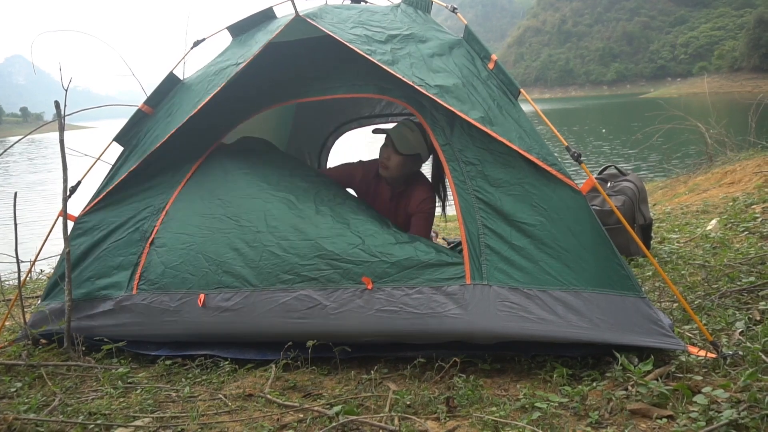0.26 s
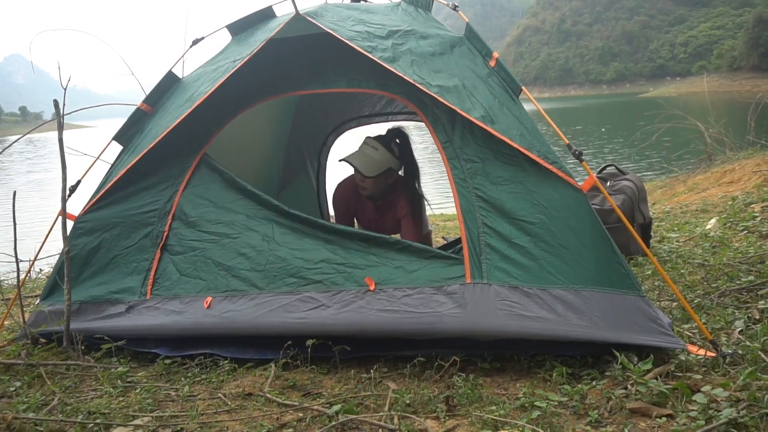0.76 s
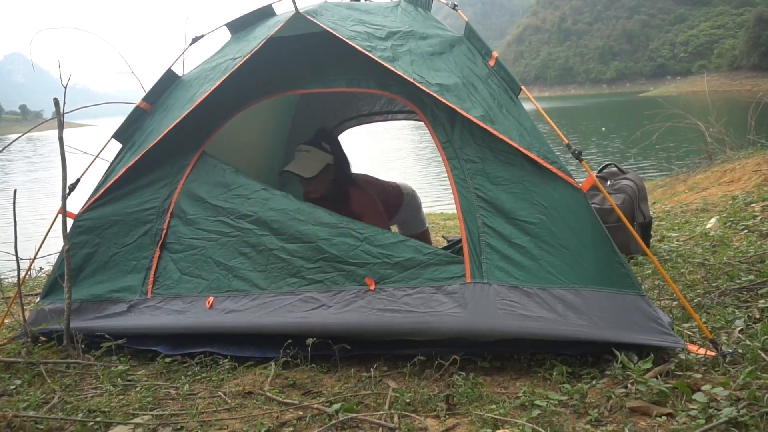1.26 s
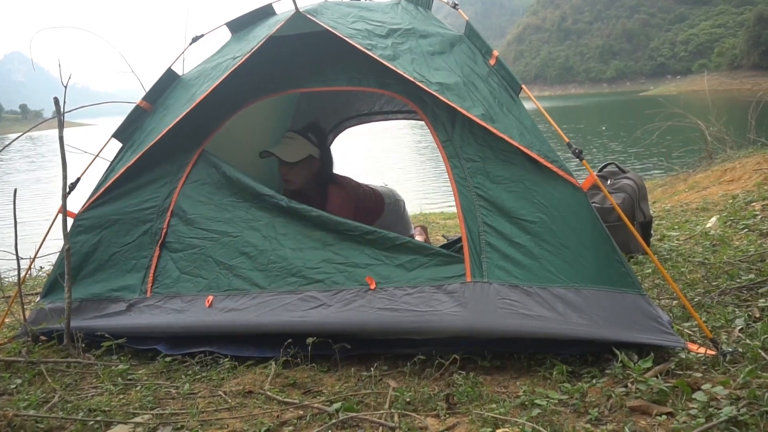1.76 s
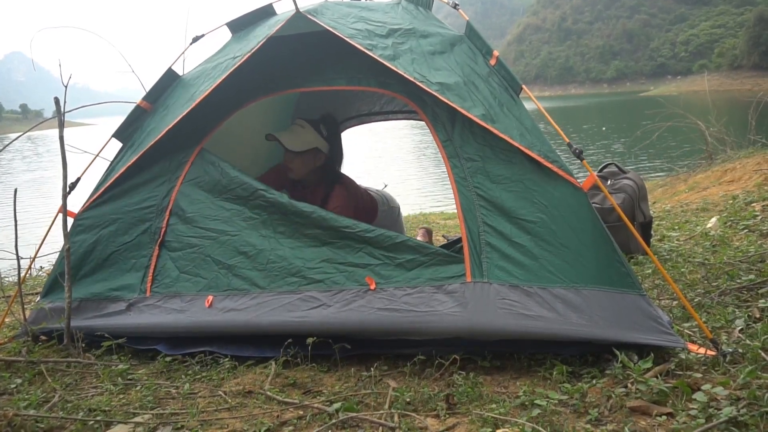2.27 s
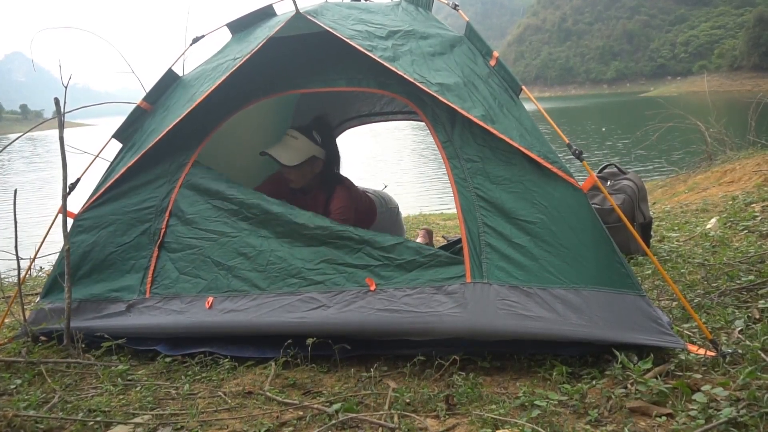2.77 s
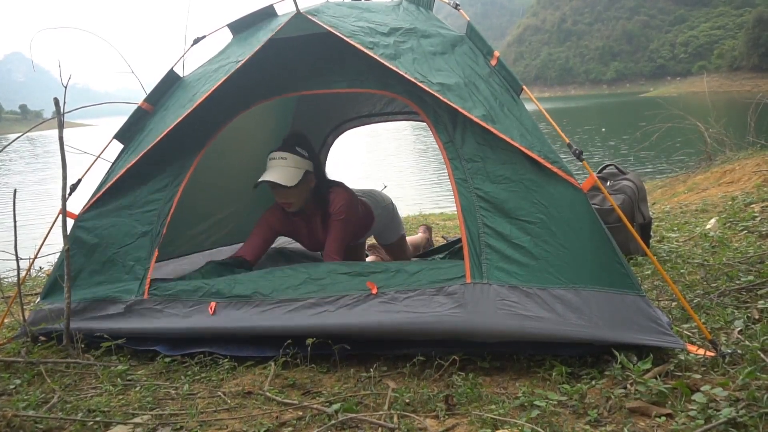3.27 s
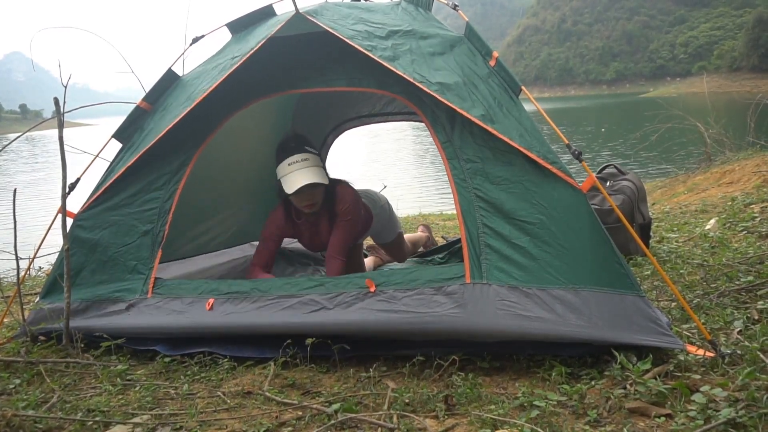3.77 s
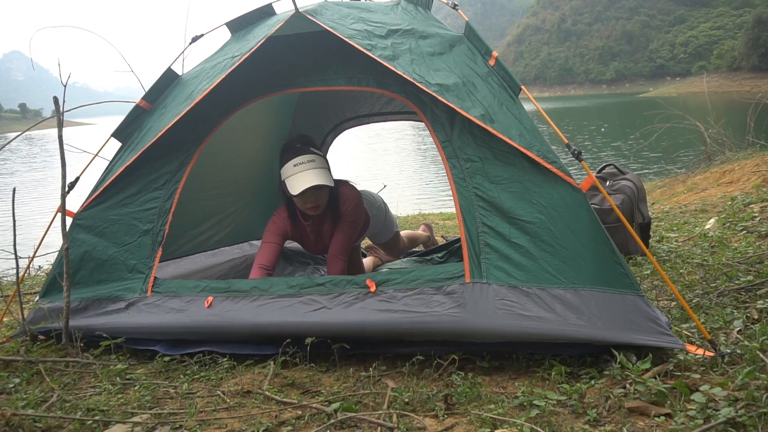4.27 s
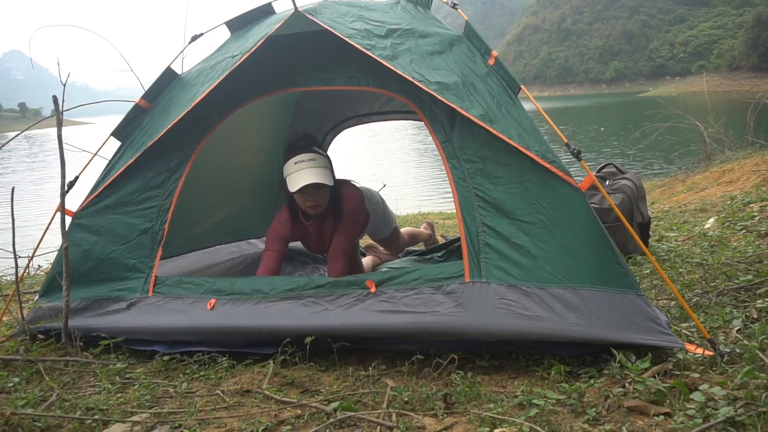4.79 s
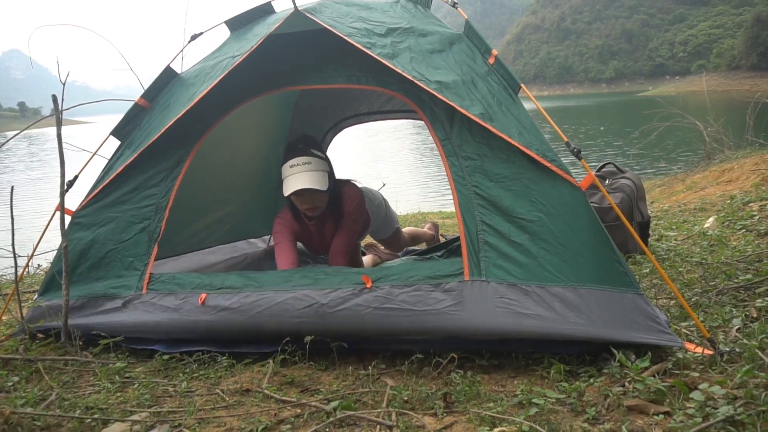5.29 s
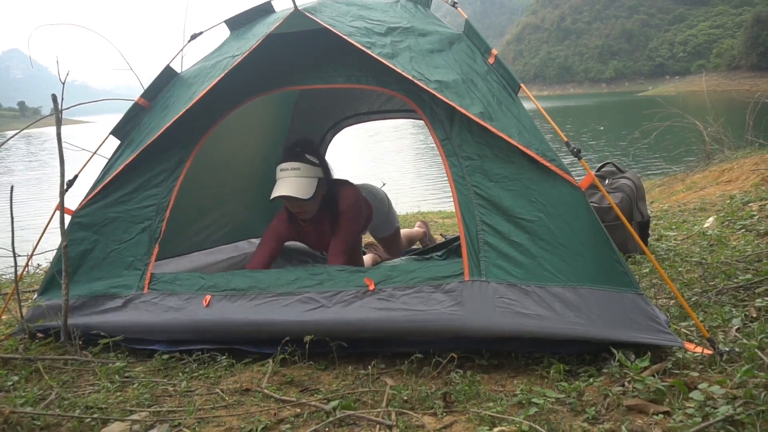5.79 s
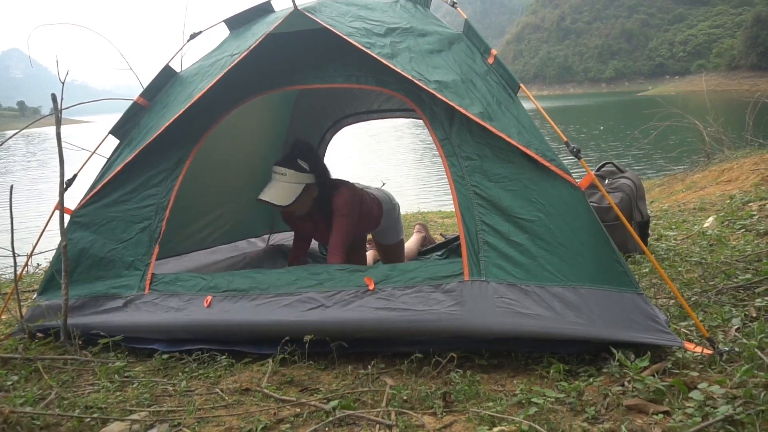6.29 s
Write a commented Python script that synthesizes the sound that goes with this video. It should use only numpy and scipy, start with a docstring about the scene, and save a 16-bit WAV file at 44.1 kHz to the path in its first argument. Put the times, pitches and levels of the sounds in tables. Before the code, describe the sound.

Two quick zipper pulls on a nylon tent door, close by, with swishing, snapping fabric and soft pats, faint birds and outdoor hush behind.

```python
"""A nylon tent door, close by, is unzipped in two quick pulls at a lakeside campsite: slider teeth jolt
the panel, whine in the tape and rasp, and the metal pull tab rings. Cloth strokes of shaped noise swish,
fold bursts snap, gliding tones squeak, and damped modes sound pats on the groundsheet and frame knocks.
Far off, bent whistles make small birds, narrow noise an insect, and steady noise a soft outdoor hush."""
import sys
import numpy as np
from scipy import signal
from scipy.fft import rfft, irfft, next_fast_len
from scipy.io import wavfile
from scipy.ndimage import uniform_filter1d

SR = 44100
rng = np.random.default_rng(int(sys.argv[2]) if len(sys.argv) > 2 else 0)


def waveform_to_disk(signal):
    """Save audio, clipped to [-1, 1], as 16-bit WAV at the path in sys.argv[1]."""
    frames = np.transpose(np.atleast_2d(signal))
    scaled = np.clip(frames, -1, 1) * 32767
    samples = np.round(scaled).astype(np.int16)
    wavfile.write(sys.argv[1], SR, samples)


N = 288590
T = np.arange(N) / SR
SIZE = next_fast_len(N + 512)
FREQS = np.maximum(np.arange(SIZE // 2 + 1) * SR / SIZE, 1)


def from_db(db):
    """Decibels to gain."""
    return 10 ** (np.asarray(db) / 20)


def rms_one(x):
    """Scale to rms 1."""
    return x / np.sqrt(np.mean(x ** 2) + 1e-20)


def at_hz(points, hz):
    """Read a table on a log-frequency axis."""
    points = np.array(points)
    return np.interp(np.log(hz), np.log(points[:, 0]), points[:, 1])


def colour(x, spectrum):
    """Give a steady sound a spectrum; rms 1."""
    shaped = rfft(x, SIZE) * from_db(at_hz(spectrum, FREQS))
    return rms_one(irfft(shaped, SIZE)[..., :N])


def band(x, low_hz, high_hz, order=2):
    """Butterworth band-pass."""
    edges = [low_hz, min(high_hz, .45 * SR)]
    sos = signal.butter(order, edges, "band", fs=SR, output="sos")
    return signal.sosfilt(sos, x + 1e-18)


def drift(rate):
    """Smooth random wander with spread 1; a higher rate wanders faster."""
    step = 20   # samples between drawn points
    r = np.exp(-2 * np.pi * step * rate / SR)
    noise = rng.standard_normal(N // step + 2002)
    slow = signal.lfilter([1], [1, -2 * r, r * r], noise)[2000:]   # skip the filter's start
    return np.interp(np.arange(N) / step, np.arange(len(slow)), rms_one(slow))


def resonance(x, hz, width_hz):
    """Two-pole resonance with gain 1 on top."""
    r = np.exp(-np.pi * width_hz / SR)
    zeros = np.array([1, 0, -1]) * (1 - r * r) / 2
    poles = [1, -2 * r * np.cos(2 * np.pi * hz / SR), r * r]
    return signal.lfilter(zeros, poles, x + 1e-18)


def grains(per_s, spread_db):
    """Two rows of tiny clicks at shared random moments, with uneven sizes; rms 1."""
    born = rng.random(N) < per_s / SR
    size = from_db(spread_db * np.minimum(rng.exponential(1, N), 4))
    return rms_one(born * size * rng.standard_normal((2, N)))


def patchy(x, depth_db, per_s):
    """Folds open and close, so narrow bands swell and fade each in their own time."""
    cells = signal.stft(x, SR, nperseg=512)[2]
    patches = uniform_filter1d(rng.standard_normal(cells.shape[1:]), size=4, axis=0)
    frames = max(2, int(SR / 256 / per_s))
    patches = uniform_filter1d(patches, size=frames, axis=1)
    changed = cells * from_db(depth_db * rms_one(patches))
    return rms_one(signal.istft(changed, SR, nperseg=512)[1][..., :N])


def turns(per_s, jitter, jitter_hz):
    """Running count of teeth passed at an unsteady speed."""
    return np.cumsum(per_s * (1 + jitter * drift(jitter_hz))) / SR


FADE_POWER = 1.09   # the fall steepens as the hand comes to rest


def swell(start_s, rise_s, fade_s, power):
    """A movement gathers speed, then dies away: 20 dB down after the fade time."""
    age = T - start_s
    rise = np.clip(age / rise_s, 0, 1) ** power
    return rise * from_db(-20 * np.clip((age - rise_s) / fade_s, 0, 10) ** FADE_POWER)


# how alike the close tent sounds on the left and right: f/Hz, likeness/0-1
TENT_LIKENESS = [(100, .997), (500, .98), (1400, .985), (2600, .82), (4500, .48), (9000, .45), (15000, .42)]


def stereo(pair, likeness=TENT_LIKENESS):
    """Two unrelated rows become left and right, whose likeness depends on frequency."""
    alike = np.clip(at_hz(likeness, FREQS), 0, 1)
    side = irfft(rfft(pair[1], SIZE) * np.sqrt((1 - alike) / (1 + alike)), SIZE)[:N]
    return pair[0] + side * [[1], [-1]]


FULL_SPEED = 1100   # teeth per s
PULL_ATTACK_S, PULL_RELEASE_S, SLACKEN_S = 0.0044, 0.05, 0.039
SPEED_LAW_DB = (3, 1.5, 4)   # panel, tape, rasp: dB gained per doubling of speed
SLACK_DB = (9.5, -3, -5)   # panel, tape, rasp: change once the flap hangs slack
# pulls on the slider: start t/s, length/s, time until the flap goes slack/s,
# then relative level/dB at full speed of door panel, tape, rasp
PULLS = [(-.006, 0.4485, 0.223, -41, -38, -39), (2.742, 0.44, 0.42, -44.5, -38, -46.5)]


def pull_gains(speed):
    """Gains of panel, tape and rasp: each grows with speed; a slack flap booms more and rasps less."""
    gains = np.zeros((3, N))
    octaves = np.log2(speed / FULL_SPEED)
    for start, length, taut_s, *levels_db in PULLS:
        age = T - start
        attack = np.clip(age / PULL_ATTACK_S, 0, 1)
        grip = attack * np.clip((length - age) / PULL_RELEASE_S, 0, 1)
        slack = np.clip((age - taut_s) / SLACKEN_S + .5, 0, 1)
        for gain, db, law_db, slack_db in zip(gains, levels_db, SPEED_LAW_DB, SLACK_DB):
            gain += grip * from_db(db + law_db * octaves + slack_db * slack)
    return gains


JUDDER_DB, PANEL_FLICKER_DB, BITE_FLICKER_DB = 6, 1.8, .6
OVERTONE_FALL_DB = 1.5   # per octave above the second overtone
# slider speed, one list for each pull: t/s, speed/teeth per s
SLIDER = [
    [(0, 610), (.03, 680), (.1, 950), (.145, 1020), (.2, 880), (.235, 607), (.28, 596), (.39, 390),
     (.44, 127)],
    [(2.74, 122), (2.78, 205), (2.82, 376), (2.86, 585), (2.93, 840), (3.02, 960), (3.08, 820), (3.16, 600),
     (3.21, 200)],
]
# response of the zipper tape: f/Hz, level/dB
TAPE = [(600, -36), (1300, -7.5), (1900, -3.5), (2700, -7), (3300, -25), (3900, -14), (5500, -18),
        (9000, -26)]
# spectrum of the rasp: f/Hz, relative level/dB per Hz
RASP = [(710, -2), (1200, 2), (1860, -4), (2090, -1), (2570, -2.5), (3460, -8), (3810, -6), (6310, -11.5),
        (13800, -12.5), (15500, -17)]


def zipper():
    """The slider parts tooth after tooth: jolts drive the door panel, the tape whines, each tooth rasps."""
    speed = np.interp(T, *np.concatenate(SLIDER).T)
    panel_gain, tape_gain, rasp_gain = pull_gains(speed)
    teeth = turns(speed, jitter=.045, jitter_hz=130)
    passed = np.diff(np.floor(teeth), prepend=0) * np.sqrt(SR / speed)

    # a slow slider catches unevenly and shakes the whole panel, most of all when braking
    braking = uniform_filter1d(np.where(np.gradient(speed) < 0, 1, .45), size=900)
    uneven = .43 + .3 * braking * np.clip((560 - speed) / 120, 0, 1)
    jolts = passed * (1 + uneven * rng.standard_normal(N)) / np.sqrt(1 + uneven ** 2)
    judder = passed * rng.standard_normal(N) * uneven ** 3
    flutter = band(jolts, 313, 960, order=3) + from_db(JUDDER_DB) * band(judder, 73, 600)
    # the steady pull keeps the force even
    flutter = flutter / np.sqrt(uniform_filter1d(flutter ** 2, size=700) + 1e-9)
    panel = flutter * from_db(-1.5 + PANEL_FLICKER_DB * drift(70)) * panel_gain

    # the overtones of the tooth rate waver one by one; the tape favours those near 2 kHz
    overtones = np.zeros(N)
    for k in range(2, 13):
        level_db = at_hz(TAPE, k * speed) - OVERTONE_FALL_DB * np.log2(k / 2) + 3 * drift(50)
        overtones += from_db(level_db) * np.sin(2 * np.pi * k * teeth + .5 * drift(80))
    tape = overtones * np.sqrt(speed / FULL_SPEED) * from_db(0.5) * tape_gain

    # the scraping noise pulses once a tooth
    pulse = np.exp(0.34 * np.cos(2 * np.pi * teeth))
    bite = rms_one(pulse * from_db(BITE_FLICKER_DB * drift(60)))
    scrape = colour(rng.standard_normal((2, N)) * bite, RASP)
    scrape = band(patchy(scrape, depth_db=3.0, per_s=22), 2000, 19000)
    rasp = scrape / np.std(band(scrape, 3770, 8800)) * from_db(-1.0) * rasp_gain
    return panel + tape + stereo(rasp)


SHAKE_RISE_S, SHAKE_FADE_S = 0.0056, 0.14   # fade = time to fall 20 dB
# modes of the metal pull tab: f/Hz, width/Hz, relative level/dB
TAB = [(4310, 70, -1), (10600, 90, 0), (14220, 70, -1)]
# shakes of the pull tab: t/s, relative level/dB
SHAKES = [(0.0, -58), (.225, -44), (.285, -43), (.345, -43), (.422, -49.5), (2.8, -58), (2.96, -56),
          (3.13, -46), (3.235, -46), (3.392, -55), (3.46, -58)]


def pull_tab():
    """Each shake sets the metal tab rattling on the slider and ringing."""
    knocks = grains(per_s=550, spread_db=5.5)
    rings = sum(from_db(db) * rms_one(resonance(knocks, hz, width)) for hz, width, db in TAB)
    swells = [from_db(db) * swell(s, SHAKE_RISE_S, SHAKE_FADE_S, 1) for s, db in SHAKES]
    shaken = np.max(swells, axis=0)
    return stereo(rings) * from_db(-6.0) * shaken


HUSH_DB = -55.5
# spectrum of the distant hush: f/Hz, relative level/dB per Hz
HUSH = [(15, -23), (25, -2.5), (75, 6), (215, -4.5), (281, 1), (378, -3), (445, -10), (782, -7.5),
        (970, -12), (1850, -12.5), (3090, -13), (6730, -21), (7500, -20.5), (13900, -24), (15500, -28)]
# how alike the distance sounds on the left and right: f/Hz, likeness/0-1
AIR_LIKENESS = [(40, .99), (90, .94), (180, .76), (350, .58), (700, .2), (1400, .15), (2800, .35),
                (6000, .05)]
# far insect, silent before the first row and after the last: t/s, level/dB
INSECT = [(1.2, -78), (1.9, -69), (2.7, -71), (3.1, -68), (3.5, -85)]


def outdoors():
    """The even hush of lake and hills is coloured noise; one insect is a thin, narrow band of noise."""
    hush = stereo(colour(rng.standard_normal((2, N)), HUSH), AIR_LIKENESS)
    thin = resonance(rng.standard_normal((2, N)), 7200, 260)
    thin = rms_one(resonance(thin, 7440, 260))
    insect_db = np.interp(T, *np.transpose(INSECT), left=-np.inf, right=-np.inf)
    return from_db(HUSH_DB) * hush + thin * from_db(insect_db)


SKID_OVERTONES_DB = (2, -7.5, -11)   # first three harmonics
SKID_ROUGH, SKID_WOBBLE, SKID_FLICKER_DB = .04, .85, 3   # share of its rate, radians, dB
SKID_ARCH = 0.6   # power of the arch of pressure
# cloth or skin skidding over the weave: t/s, length/s, start f/Hz, end f/Hz (threads per s),
# relative level/dB
SKIDS = [(.042, .03, 2850, 3080, -39), (.186, .03, 1820, 1620, -37.5), (2.78, .07, 520, 980, -44.5),
         (3.06, .04, 1830, 1570, -41.5), (3.15, .028, 1370, 1130, -43), (4.114, .04, 800, 1200, -36),
         (4.127, .007, 1150, 1200, -29.5), (4.1275, .0135, 630, 800, -26), (5.19, .02, 1150, 1350, -45),
         (5.208, .028, 1980, 2300, -41), (5.234, .03, 2450, 3300, -43)]


def skids():
    """A contact sticks and slips across the threads in a short, rough, gliding squeak."""
    out, unsteady = np.zeros(N), 1 + SKID_ROUGH * drift(290)
    overtones = [(from_db(db + SKID_FLICKER_DB * drift(135)), SKID_WOBBLE * drift(290))
                 for db in SKID_OVERTONES_DB]
    for s, length, start_hz, end_hz, db in SKIDS:
        u = np.linspace(0, 1, int(length * SR))
        at = round(s * SR)
        span = slice(at, at + len(u))
        rate = (start_hz + (end_hz - start_hz) * u) * unsteady[span]
        slips = np.cumsum(rate) / SR
        squeak = sum(gain[span] * np.sin(2 * np.pi * k * slips + wobble[span])
                     for k, (gain, wobble) in enumerate(overtones, start=1))
        pressure = np.abs(np.sin(np.pi * u)) ** SKID_ARCH
        out[span] += from_db(db) * pressure * squeak
    return out


SWELL_POWER = 1.03   # a stroke gains speed a little faster than evenly
# strokes of cloth on cloth: start t/s, rise/s, fade/s,
# then relative level/dB of billow, rub, hiss
STROKES = [(.40, 0.017, 0.42, -53.5, -53.5, -58), (.745, 0.031, .2, -53, -49.5, -48),
           (.77, 0.054, 0.21, -48, -45.5, -48), (1.08, 0.1, 0.37, -53.5, -49.5, -51),
           (1.47, 0.042, 0.28, -54.5, -51.5, -55), (1.66, 0.089, .2, -56, -48.5, -52),
           (1.9, 0.049, .15, -56, -56, -62.5), (3.14, 0.035, 0.076, -40, -41.5, -43),
           (3.225, 0.018, 0.064, -40.5, -40, -41), (3.27, 0.055, 0.44, -53, -54.5, -56),
           (3.38, 0.01, 0.074, -48, -40, -44), (3.42, 0.035, 0.13, -48, -54.5, -68),
           (3.53, 0.079, 0.14, -70, -67, -53), (3.87, 0.083, 0.78, -50, -47.5, -49.5),
           (3.95, 0.11, 0.35, -51.5, -49.5, -43), (4.09, 0.031, 0.056, -45, -40.5, -54),
           (4.12, 0.026, 0.045, -40, -37.5, -37), (4.205, 0.022, 0.096, -43.5, -39, -39.5),
           (4.21, 0.11, 1, -56, -47.5, -43.5), (4.359, 0.12, 0.14, -38, -35.5, -34.5),
           (4.635, 0.04, 0.15, -50, -41, -66), (4.65, 0.093, 0.15, -38.5, -38, -39),
           (4.75, 0.028, 0.07, -38.5, -40, -59), (4.8, 0.096, 0.27, -52.5, -54, -52),
           (4.96, 0.058, 0.082, -59, -52, -51), (5.149, 0.091, 0.23, -46.5, -43, -43),
           (5.222, 0.025, 0.041, -54, -46, -34.5), (5.26, 0.088, 0.17, -46, -44, -42.5),
           (5.41, 0.034, 0.31, -54.5, -46.5, -45), (5.59, 0.04, .04, -59, -59, -50.5),
           (5.75, 0.11, 0.14, -45.5, -43, -42), (5.92, 0.18, 0.43, -59, -54.5, -54.5),
           (6.19, 0.042, 0.17, -56.5, -50.5, -50.5), (6.439, 0.039, 0.12, -45.5, -41.5, -44.5)]


def stroke_gains():
    """Gains of billow, rub and hiss: overlapping strokes add in power."""
    shapes = np.array([swell(*row[:3], SWELL_POWER) for row in STROKES])
    levels = from_db(np.array(STROKES)[:, 3:].T)
    return np.sqrt(levels ** 2 @ shapes ** 2)


# spectrum of sliding nylon: f/Hz, relative level/dB per Hz
NYLON = [(41, -37), (70, -14.5), (129, -2.5), (169, -6), (254, -0.5), (399, -5.5), (467, -8.5), (785, -1.5),
         (920, -10.5), (1100, -6), (1620, -9.5), (3410, -6), (4000, -6.5), (9010, -6), (15500, -8)]


def cloth():
    """Nylon slides on nylon: the sheet billows, the weave rubs, and tiny creases crackle on top."""
    friction = rng.standard_normal((2, N)) * from_db(1.2 * drift(66))
    sheet = colour(friction + 0.67 * grains(per_s=1800, spread_db=3.0), NYLON)
    # each layer is levelled by its strength in a reference band
    billow = band(sheet, 86, 696) / np.std(band(sheet, 85.9, 567)) * from_db(0.5)
    folds = patchy(sheet, depth_db=2.5, per_s=30)
    rub = band(folds, 507, 2890) / np.std(band(folds, 1560, 4050)) * from_db(1.0)
    crackle = rng.standard_normal((2, N)) + 0.77 * grains(per_s=2600, spread_db=0.5)
    creases = patchy(colour(crackle, NYLON), depth_db=2.4, per_s=34)
    hiss = band(creases, 2940, 15800) / np.std(band(creases, 5700, 13260)) * from_db(-.5)
    billow_gain, rub_gain, hiss_gain = stroke_gains()
    return stereo(billow * billow_gain + rub * rub_gain + hiss * hiss_gain)


# hard little ticks of the fittings: t/s, relative level/dB, centre f/Hz
TICKS = [(.4325, -27.5, 5500), (0.5078, -30.5, 1388), (0.5367, -34, 5040), (2.0948, -16.5, 13200),
         (2.738, -41, 2992), (3.390, -37, 3500), (3.447, -45, 1800), (3.495, -45, 1500),
         (3.5106, -43, 1200), (4.66, -22.5, 2500)]


def ticks():
    """A crack of a few milliseconds from one point, with a faint scattered tail."""
    out, age = np.zeros((2, N)), T[:SR // 10]
    for s, db, hz in TICKS:
        white = rng.standard_normal((3, len(age)))
        broad = rms_one(band(white, hz / 5, hz * 3, order=1))
        noise = rms_one(broad + 0.98 * rms_one(resonance(white, hz, hz / 4)))
        crack = noise[0] * from_db(-60 * age / 0.013)
        tail = noise[1:] * from_db(-15.5 - 60 * age / 0.1)
        at = round(s * SR)
        out[:, at:at + len(age)] += from_db(db - 8.0) * (crack + tail)
    return out


# pats on the groundsheet: t/s, relative level/dB, pitch f/Hz, t60/s
PATS = [(0.505, -32.5, 294.4, 0.019), (.95, -41, 650, 0.033), (1.357, -37, 1433, 0.07),
        (3.18, -43, 324, 0.027), (3.444, -30, 1290, 0.024), (3.458, -29, 770, 0.02),
        (3.492, -30, 766, 0.019), (3.512, -28.5, 775, 0.015), (4.211, -34, 790, 0.033),
        (4.637, -29.5, 290, 0.04), (5.696, -42, 706, .02), (6.378, -47, 1270, 0.02)]
# modes of the groundsheet: multiple of the pitch, relative level/dB
SHEET = [(.55, -16.5), (1.0, 1.5), (1.14, -22), (1.6, -7), (2.7, -17.5)]


def pats():
    """A soft blow of hand or knee sets the groundsheet ringing briefly."""
    out, age = np.zeros(N), T[:SR // 10]
    for s, db, hz, t60 in PATS:
        ring = sum(from_db(mode_db) * np.sin(2 * np.pi * (hz * ratio * age + rng.random()))
                   for ratio, mode_db in SHEET)
        noise = band(rng.standard_normal(len(age)), 194.7, 2200, order=1)
        contact = from_db(-5.0) * rms_one(noise)
        envelope = (1 - np.exp(-age / 0.0003)) * from_db(-60 * age / t60)
        at = round(s * SR)
        out[at:at + len(age)] += from_db(db - 2.5) * (ring + contact) * envelope
    return out


# far bird notes: t/s, length/s, start f/Hz, middle f/Hz, end f/Hz, relative level/dB
BIRDS = [(0.622, 0.091, 3100, 2840, 2980, -52), (0.934, 0.097, 4010, 3610, 3500, -47.5),
         (1.071, 0.08, 3450, 3020, 2910, -47), (1.23, 0.18, 3120, 3040, 3080, -48),
         (1.434, 0.095, 4000, 4000, 4330, -49), (1.543, 0.17, 3580, 3450, 3090, -47),
         (2.247, 0.057, 3950, 3900, 4160, -48.5), (2.313, .08, 4100, 4060, 3670, -54),
         (2.354, .08, 3150, 3050, 3120, -60), (2.413, .14, 3390, 3300, 2970, -46),
         (2.527, 0.061, 3023, 2850, 2880, -49), (3.356, 0.037, 4440, 4050, 3800, -47),
         (3.463, 0.04, 3700, 4000, 4600, -45), (3.734, 0.031, 4130, 4010, 3620, -44.5),
         (3.847, 0.033, 3470, 3930, 4700, -44)]


def birds():
    """Far whistled notes that bend through three pitches, blurred by echoes from the shore."""
    song, quaver = np.zeros(N), drift(150)
    for s, length, start_hz, middle_hz, end_hz, db in BIRDS:
        u = np.linspace(0, 1, int(length * SR))
        at = round(s * SR)
        hz = np.polyval(np.polyfit([0, .5, 1], [start_hz, middle_hz, end_hz], 2), u)
        hz = hz * (1 + 0.011 * quaver[at:at + len(u)])
        whistle = np.sqrt(4 * u * (1 - u)) * np.sin(2 * np.pi * np.cumsum(hz) / SR)
        song[at:at + len(u)] += from_db(db - 10.0) * whistle
    age = T[:SR // 2]
    echoes = rng.standard_normal((2, len(age))) * from_db(-60 * age / 0.31)
    echoes /= np.sqrt(np.sum(echoes ** 2, axis=1, keepdims=True))
    return song + from_db(-1.0) * signal.fftconvolve(song[None], echoes, axes=1)[:, :N]


# knocks of the settling tent frame: t/s, relative level/dB
KNOCKS = [(2.0512, -35), (2.0542, -29.5)]
# modes of the poles: f/Hz, relative level/dB, t60/s
FRAME = [(373, -18, 0.053), (1150, -1, 0.029), (1240, -11, 0.059), (3170, -14.5, 0.013)]


def frame():
    """A dull hollow tock from the poles: each knock rings a few damped modes."""
    out, age = np.zeros(N), T[:SR // 10]
    ring = sum(from_db(db - 60 * age / t60) * np.sin(2 * np.pi * hz * age) for hz, db, t60 in FRAME)
    for s, db in KNOCKS:
        at = round(s * SR)
        out[at:at + len(age)] += from_db(db) * ring
    return out


# cloth flicked taut: t/s, relative level/dB, t60/s
SNAPS = [(3.216, -17.5, 0.062), (3.24, -16.5, 0.061), (3.249, -28, 0.046), (3.394, -22, 0.076),
         (5.198, -25, 0.05), (6.448, -34, .06)]


def snaps():
    """A fold flips over, and the cloth around it shivers briefly: a decaying burst of noise."""
    out = np.zeros((2, N))
    for s, db, t60 in SNAPS:
        at = round(s * SR)
        age = T[:min(SR // 10, N - at)]
        burst = rng.standard_normal((2, len(age)))
        out[:, at:at + len(age)] += from_db(db - 14.0 - 60 * age / t60) * burst
    return stereo(band(out, 510, 16000, order=1))


def tent_walls(x):
    """Thin walls let the bass through and return weak treble echoes, at other delays on each side."""
    out, bounced = x.copy(), band(x, 2450, 25000)
    lags = (rng.uniform(0.00092, 0.013, 10) * SR).astype(int)
    for k, lag in enumerate(lags):
        side, sign = k % 2, (-1) ** (k // 2)
        out[side, lag:] += from_db(-17.5) * sign * bounced[side, :-lag]
    return out


# where the hands work: t/s, left minus right level/dB
HANDS = [(0.0, 2.5), (.35, 3.5), (1.1, 0.7), (2.5, 1.5), (3.1, 5), (3.6, 1.5), (4.5, 3.5), (5.3, 1.5),
         (5.95, 4), (6.54, 2)]
# how strongly each pitch takes up that lean: f/Hz, share of the change in gain
LEAN = [(400, 0), (1200, 0.33), (2400, 0), (4500, 1.14), (8000, 1.46), (15000, 1.6)]


def scene():
    """The close tent stands a little to the left: earlier there, and louder mostly in the treble."""
    tent = zipper() + pull_tab() + cloth() + snaps() + ticks() + pats() + frame() + skids()
    tent = tent_walls(tent)
    tent = np.array([tent[0], np.roll(tent[1], 1)])   # one sample later on the right
    shaded = irfft(rfft(tent, SIZE) * at_hz(LEAN, FREQS), SIZE)[:, :N]
    lean = from_db(np.interp(T, *np.transpose(HANDS)) * [[.5], [-.5]])
    return tent + shaded * (lean - 1) + birds() + outdoors()


CUTOFF_HZ = 15900


def record(dry):
    """The top is cut steeply by an elliptic low-pass."""
    return signal.sosfilt(signal.ellip(10, .2, 80, CUTOFF_HZ, fs=SR, output="sos"), dry)


dry = scene()
out = record(dry)
waveform_to_disk(out)
```